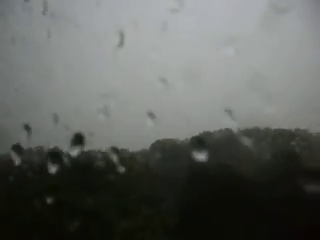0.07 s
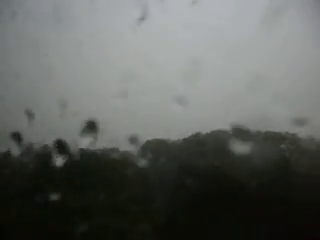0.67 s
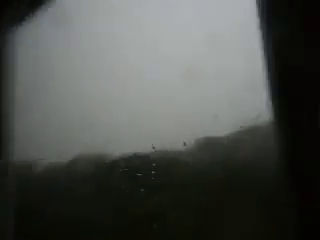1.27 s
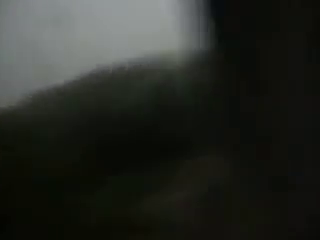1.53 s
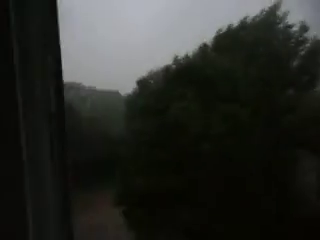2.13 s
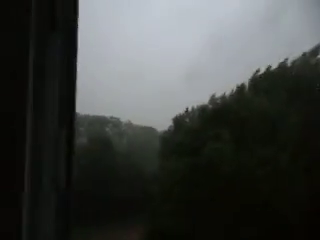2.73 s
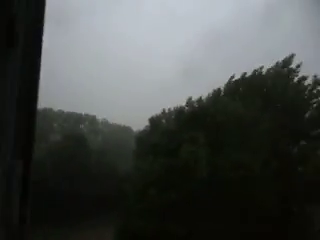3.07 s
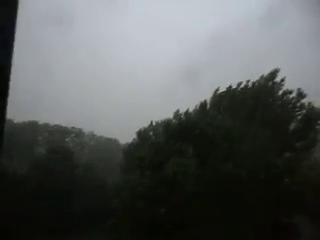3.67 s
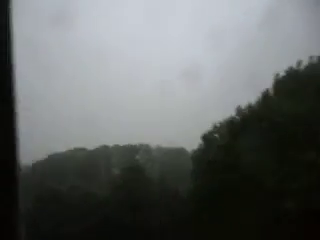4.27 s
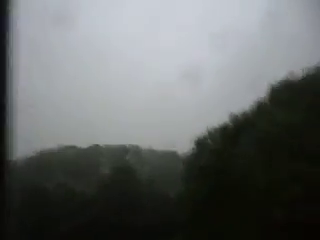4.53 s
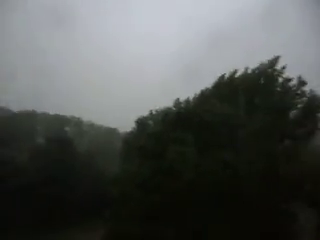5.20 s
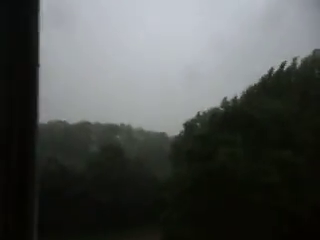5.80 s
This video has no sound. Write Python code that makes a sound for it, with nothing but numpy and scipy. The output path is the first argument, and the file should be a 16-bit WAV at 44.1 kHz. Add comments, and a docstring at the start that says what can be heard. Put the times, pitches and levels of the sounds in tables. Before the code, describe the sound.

A rainstorm is heard on one small microphone at a window. For the first second the wind is a muted rumble, with a low room boom, a faint hum from the glass and fat drops smacking the pane. Dry ticks on the window frame start near 0.7 seconds. At about 1.2 seconds the wind jumps in level with a faint whistle, and a soft hiss of rain on trees rises behind it. From 1.5 to 2.3 seconds the hardest gusts thud and rasp on the microphone, with a hollow roar at the window's edge and a brief whistle near 2.2. The wind then eases somewhat but keeps buffeting, with another run of thumps from 3.2 to 3.9 and more around 4.7 and 5. Single drops click sharply near 2.3, 4.3 and 5.2 seconds. Rain and weaker wind continue until 6 seconds.

```python
"""A rainstorm at a window, on the single microphone of a small camera. It starts close behind the wet pane:
the glass hums, fat drops smack on it, and gusts buffet the microphone and make the room boom like a
blown bottle. Drops begin to tick on the frame. After a second the camera moves to the open casement: the
gap whistles, the hiss of rain on thrashing trees comes up, and drops strike the camera itself. Around two
seconds the hardest gusts set the casement's edge roaring; then the wind eases and the rain carries on."""
import sys
import numpy as np
from scipy import signal
from scipy.fft import rfft, irfft
from scipy.io import wavfile
from scipy.ndimage import uniform_filter1d, map_coordinates

SR = 44100
rng = np.random.default_rng(int(sys.argv[2]) if len(sys.argv) > 2 else 0)


def store_pcm(level_fs):
    """Save levels as 16-bit WAV."""
    pcm = np.round(np.clip(level_fs, -1, 1) * 32767).astype(np.int16)
    wavfile.write(sys.argv[1], SR, np.atleast_2d(pcm).T)


N = 265482


def undb(db):
    """Decibels to gain."""
    return 10 ** (np.asarray(db) / 20)


def unit(x):
    """Scale to rms 1."""
    return x / np.sqrt(np.mean(x ** 2))


def peak(x, db):
    """Scale to a peak level."""
    return x * undb(db) / np.abs(x).max()


def steady(x, span_s):
    """Hold rms 1 over spans of this length; quicker flutter stays."""
    k = int(span_s * SR / 2) + 1
    return x / np.sqrt(uniform_filter1d(uniform_filter1d(x ** 2, k), k) + 1e-18)


def colour(x, points, tilt_db=0):
    """Filter by a (Hz, dB) spectrum, tilted per octave and falling 18 dB an octave past its ends."""
    size = 16384
    octave = np.log2(np.maximum(np.fft.rfftfreq(size, 1 / SR), 1))
    hz, db = np.transpose(points)
    beyond = np.maximum(octave - np.log2(hz[-1]), 0) + np.maximum(np.log2(hz[0]) - octave, 0)
    shape = np.interp(octave, np.log2(hz), db + tilt_db * np.log2(hz / hz.mean())) - 18 * beyond
    # minimum phase: nothing sounds ahead of an attack
    cepstrum = irfft(np.log(undb(shape)))
    cepstrum[1:size // 2] *= 2
    cepstrum[size // 2 + 1:] = 0
    return signal.fftconvolve(x, irfft(np.exp(rfft(cepstrum))))[:len(x)]


def resonate(x, hz, width_hz, passes=1):
    """A resonance with gain 1 at its centre; each further pass narrows it."""
    for _ in range(passes):
        x = signal.lfilter(*signal.iirpeak(hz, hz / width_hz, SR), x)
    return x


def walk(rate_hz):
    """Smooth random motion with a spread of 1."""
    k = max(int(SR / rate_hz), 1)
    return unit(uniform_filter1d(uniform_filter1d(rng.standard_normal(N), k), k))


def wavering_tone(hz, waver, rate_hz):
    """A sine of rms 1 whose pitch wanders by the share `waver`."""
    pitch = hz * (1 + waver * walk(rate_hz))
    return np.sqrt(2) * np.sin(2 * np.pi * np.cumsum(pitch) / SR)


def curve(table):
    """A (time, value) curve at every sample."""
    return np.interp(np.arange(N) / SR, *np.transpose(table))


def bell(s, length_s):
    """A smooth rise and fall around time s, above half its height for length_s."""
    return .5 ** ((2 * (np.arange(N) / SR - s) / length_s) ** 2)


def level_shifts(table):
    """Two dB curves from a table of rises and dips, each a bell in time."""
    return sum(np.outer(dbs, bell(s, length_s)) for s, length_s, *dbs in table)


def add(out, s, sound):
    """Mix a sound in at time s."""
    i = min(max(int(s * SR), 0), N)
    out[i:i + len(sound)] += sound[:N - i]


# wind at the opening: (time [s], strength over a moderate blow [dB])
WIND = [(0, -14.5), (.52, -5.5), (.68, -7), (.92, -3.5), (1.155, -6.5), (1.175, 1), (1.53, -0.5),
        (1.56, 5.5), (1.95, 5.5), (2.2, 5.5), (2.4, 2), (3.0, 0.5), (3.6, 1.5), (4.0, 0), (4.35, -2),
        (5.1, 0), (6.02, -4)]


def blown(db, growth=1, shift_db=0):
    """Gain of a layer: `db` in a moderate blow, `growth` dB more per dB of wind, plus a passing shift."""
    return undb(db + growth * curve(WIND) + shift_db)


# wind on the microphone, four spectra: (frequency [Hz], relative level [dB])
THUD_SPECTRUM = [(50, -24.5), (95, -15), (130, 2.5), (170, -1), (220, -2), (300, -6.5), (400, -8.5),
                 (520, -16), (800, -36.5), (2500, -64.5)]
RASP_SPECTRUM = [(250, -18.5), (450, -1), (600, 0.5), (790, -3), (1000, -6), (1300, -14), (1700, -20.5),
                 (2500, -29), (4500, -54.5), (10000, -74)]
RUMBLE_SPECTRUM = [(35, -7.5), (55, -5), (78, 0.5), (104, -2.5), (125, -11.5), (200, -23)]
FLUTTER_SPECTRUM = [(4, -8), (12, -5.5), (28, 15), (40, 4.5), (70, -27.5)]
# brief flurries and lulls in the wind on the microphone:
# (middle [s], length [s], thud shift [dB], rasp and roar shift [dB])
FLURRIES_AND_LULLS = [(.08, 0.21, -5.5, 0), (1.185, 0.027, 0.5, 3), (1.26, 0.02, 0, 1),
                      (1.435, 0.025, -4, 0.5), (1.565, 0.041, 2.5, 3), (1.722, 0.026, 0, 3),
                      (1.78, 0.023, -2, -2.5), (1.808, 0.026, -1.5, 5), (2.105, 0.037, 0.5, 3.5),
                      (2.165, 0.044, 4, 4), (2.22, 0.045, -0.5, 3), (2.325, 0.029, -7, 2),
                      (2.6, 0.1, -2.5, 0.5), (2.86, 0.1, 5.5, 0), (2.905, 0.03, -7, 1),
                      (3.03, 0.058, 0, -0.5), (3.215, 0.033, 5, -0.5), (3.258, 0.022, -3.5, -1),
                      (3.305, .03, 4, -0.5), (3.34, 0.013, 10, 4), (3.365, 0.018, 1, -3),
                      (3.435, 0.078, 6.5, 2), (3.51, .025, -5, 0), (3.575, 0.016, 3, 0),
                      (3.885, 0.037, 1.5, 2.5), (3.96, 0.027, -1.5, -4), (4.68, 0.045, -4.5, 1),
                      (4.98, 0.037, 2.5, 0.5)]
# slow swells and lulls in the wind's rumble and the room's ringing:
# (middle [s], length [s], rumble and flutter shift [dB], ringing shift [dB])
SWELLS_AND_LULLS = [(.06, .14, -18, -2), (.51, 0.15, 13.5, 6.5), (.89, 0.067, 7, 2), (1.75, 0.13, -2, 5.5),
                    (2.08, 0.12, -7, 1.5), (3.19, 0.17, 9.5, -0.5), (3.48, 0.25, 6.5, 6.5),
                    (3.72, 0.23, 5, 8), (4.11, 0.16, 10, 2), (4.37, .1, 4, 3.5), (4.525, 0.048, 12, 1),
                    (4.67, 0.13, 9, 10), (5.0, 0.25, 1, 5.5), (5.57, 0.36, 7.5, 1.5)]


def wind_on_microphone():
    """Turbulence comes in lumps: big eddies thud, and shed fine ones that rasp at the same moments."""
    thud_db, rasp_db = level_shifts(FLURRIES_AND_LULLS)
    rumble_db, _ = level_shifts(SWELLS_AND_LULLS)
    lumps = walk(69)
    thud = steady(colour(rng.standard_normal(N) * undb(1.17 * lumps), THUD_SPECTRUM), 0.088)
    octaves_per_db = -0.0251  # the rasp sinks a little in pitch as the wind rises
    travel = np.cumsum(2 ** (octaves_per_db * (curve(WIND) - 2)))
    eddies = map_coordinates(colour(rng.standard_normal(N), RASP_SPECTRUM), [travel], mode="mirror")
    rasp = steady(eddies * undb(0.78 * lumps + 0.21 * walk(440)), 0.14)
    rumble = steady(colour(rng.standard_normal(N), RUMBLE_SPECTRUM), 0.23)
    flutter = steady(colour(rng.standard_normal(N), FLUTTER_SPECTRUM), .3)
    return (thud * blown(-27.5, shift_db=thud_db)
            + rasp * blown(-38, shift_db=rasp_db)
            + rumble * blown(-35.5, growth=0.91, shift_db=rumble_db)
            + flutter * blown(-43.5, growth=0.91, shift_db=rumble_db))


# surges of the lowest resonance of the room behind the microphone: (middle [s], length [s], level [dB])
BOOMS = [(0.347, 0.11, -29), (0.623, 0.19, -23.5), (1.378, 0.059, -29), (1.532, 0.067, -27),
         (1.89, 0.17, -29), (2.07, 0.092, -23.5), (3.207, 0.072, -33), (4.753, 0.14, -25),
         (5.182, 0.13, -30.5)]
# the room's higher resonances: (frequency [Hz], width [Hz], relative gain [dB])
ROOM_MODES = [(75.36, 1.3, -1.5), (98, 2.4, -4), (133.3, 8.2, -2.5), (157.3, 1.67, 6.5), (206.7, 14, -14.5),
              (233.9, 8.5, -8), (278, 5.8, -7.5)]


def room_boom():
    """Wind across the opening blows the room's lowest resonance and stirs the higher ones."""
    surge_power = sum((undb(db) * bell(s, length_s)) ** 2 for s, length_s, db in BOOMS)
    boom_gain = np.sqrt(blown(-38.5, growth=0.96) ** 2 + surge_power)
    drone = wavering_tone(hz=43.84, waver=.015, rate_hz=9) * undb(0.37 * walk(7.9))
    # only slow pressure swings act on the room as a whole
    air = signal.sosfilt(signal.butter(4, 400, fs=SR, output="sos"), rng.standard_normal(N))
    ringing = sum(undb(db) * resonate(air, hz, width) for hz, width, db in ROOM_MODES)
    _, ringing_db = level_shifts(SWELLS_AND_LULLS)
    return boom_gain * drone + blown(-35, growth=0.76, shift_db=ringing_db) * steady(ringing, 1.0)


# rain on the trees outside, louder as the microphone clears the pane: (time [s], wash level [dB])
RAIN_LEVEL = [(0, -63.5), (1.15, -63), (1.85, -51), (2.7, -50.5), (5.2, -48.5), (6.02, -49)]
# the wash and its fine spray, heard from the window: (frequency [Hz], relative level [dB])
WASH_SPECTRUM = [(500, 1.5), (1200, 2), (1600, 3), (2100, 6), (2500, 3), (3000, 2.5), (3500, -2.5),
                 (4200, -16), (6000, -17)]
SPRAY_SPECTRUM = [(2500, -10.5), (3900, 2.5), (5000, 3.5), (5600, 2.5), (5950, 0.5), (6600, -5), (8000, -8),
                  (10000, -12), (12000, 0)]


def rain_on_trees(drops_per_s=3000, spray_db=-6):
    """Countless drops on swaying leaves merge into a wash, with a fine spray above it."""
    lands = rng.random(N) < drops_per_s / SR
    sizes = undb(3.2 * np.minimum(rng.exponential(size=N), 6))
    drops = unit(lands * sizes * np.sign(rng.standard_normal(N)))
    leaves = rng.standard_normal(N) * undb(walk(17))
    wash = unit(colour(leaves + 0.96 * drops, WASH_SPECTRUM))
    spray = unit(colour(rng.standard_normal(N) + 0.51 * drops, SPRAY_SPECTRUM))
    return undb(curve(RAIN_LEVEL)) * (wash + undb(spray_db) * spray)


def pane_hum(level_db=-42.5, leave_s=0.99):
    """The wind makes the glass hum, heard only while the microphone is close behind it."""
    hum = resonate(rng.standard_normal(N), hz=233, width_hz=59, passes=2)
    return undb(level_db) * steady(hum, 0.16) * bell(leave_s / 2, leave_s + .3)


# drops on the window, from inside: (time [s], peak [dB], tilt [dB/octave], ring of the spot hit [Hz])
SMACKS = [(0.003, -37.5, -7.5, 2830), (0.015, -41, -2, 1900), (0.028, -37, -5, 2900),
          (0.039, -44, -5, 1800), (0.056, -42, -5, 2900), (0.119, -42, -2.5, 1820),
          (0.122, -35.5, -5.5, 2750), (0.382, -37.5, 5, 2850), (0.4354, -40, 3, 2950),
          (0.673, -43, -7.5, 2900), (0.79, -38, 3.5, 3000), (0.851, -42.5, 13, 3000),
          (0.856, -30, -0.5, 2970), (0.883, -43, 9, 2900), (1.13, -41.5, 0, 2700), (1.1524, -35.5, 4, 2250),
          (1.262, -39.5, 0, 2800), (1.276, -42, -2, 2750), (1.339, -35, -1, 2900), (1.378, -38.5, 4, 3100),
          (1.397, -38.5, 4, 3050), (5.2414, -32, -3, 2850)]
# a smack on a spot that rings at 2900 Hz: (frequency [Hz], relative level [dB])
SMACK_SPECTRUM = [(700, -4), (1500, -1.5), (2200, 2), (2900, 7), (3500, 1.5), (4200, -8.5), (5800, -13.5),
                  (7000, -21), (10000, -31)]


def window_smacks():
    """Each fat drop bursts on the window: a hard crack, a brief splash, and the room carrying it on."""
    out, t = np.zeros(N), np.arange(SR // 3) / SR
    crack_t60, splash_t60, room_t60 = 0.011, 0.13, 0.35
    crack_db, tail_db = 2, -5.5
    burst_decay = undb(crack_db - 60 * t / crack_t60) + undb(-60 * t / splash_t60)
    walls = signal.butter(2, 4500, fs=SR, output="sos")  # they soak up the tail's treble
    for s, db, tilt_db, hz in SMACKS:
        splash, echo = rng.standard_normal((2, len(t)))
        tail = signal.sosfilt(walls, echo) * undb(tail_db - 60 * t / room_t60)
        spot = np.multiply(SMACK_SPECTRUM, [hz / 2900, 1])
        add(out, s, peak(colour(splash * burst_decay + tail, spot, tilt_db), db))
    return out


# short trains of eddies right on the microphone: (time [s], peak [dB], centre [Hz], fall time [s])
SLAPS = [(.521, -20, 130, .006), (1.198, -19, 170, .014), (1.271, -18, 150, .012),
         (1.556, -14.5, 480, .0025), (1.562, -16, 450, .002), (1.586, -10.5, 160, .007),
         (1.718, -8.7, 175, .008), (1.740, -14, 170, .007), (1.802, -9, 160, .006), (1.849, -14, 180, .004),
         (2.018, -15, 150, .005), (2.088, -12, 300, .003), (2.101, -15, 420, .0025),
         (2.160, -10.5, 195, .007), (2.172, -16, 620, .0018), (2.296, -13.5, 160, .005),
         (2.831, -18, 210, .005), (3.161, -14.5, 320, .003), (3.205, -11.5, 125, .007),
         (3.3365, -15.5, 760, .0011), (3.348, -11.5, 200, .004), (3.392, -14, 250, .003),
         (3.409, -14, 200, .005), (3.427, -11.5, 230, .006), (3.472, -10.5, 165, .008),
         (3.5432, -6, 560, .00055), (3.5475, -14, 230, .003), (3.643, -15, 300, .002),
         (3.809, -12, 190, .005), (3.891, -14, 330, .0035), (4.621, -18, 150, .01),
         (4.692, -14.5, 150, .016), (4.977, -15.5, 170, .007), (4.993, -17, 190, .004),
         (5.119, -17, 170, .004), (5.458, -17, 190, .004)]


def vortex_slaps(unevenness=.3):
    """A few unevenly spaced vortices cross the microphone: suction and pressure briefly alternate."""
    out, half = np.zeros(N), SR // 15
    t = np.arange(-half, half) / SR
    for s, db, hz, fall_s in SLAPS:
        spacing = np.tanh(unit(uniform_filter1d(rng.standard_normal(len(t)), int(SR / hz / 2))))
        turns = np.cumsum(hz * (1 + unevenness * spacing)) / SR
        pressure = -np.cos(2 * np.pi * (turns - turns[half]))
        envelope = undb(db) / (1 + (t / fall_s) ** 2) ** 2
        add(out, s - half / SR, pressure * envelope)
    return out


# drops on the window frame, beside the microphone: (time [s], peak [dB], ring [Hz])
TICKS = [(.7455, -42, 2400), (.8555, -29, 2400), (.8568, -32, 3900), (0.9306, -33.5, 1400),
         (.9648, -36.5, 2200), (.9947, -31, 1450), (1.533, -32, 1590), (1.602, -33, 2400),
         (1.727, -34.5, 2880), (1.7795, -22, 1300), (1.7835, -24.5, 1350), (1.926, -30, 1500),
         (2.172, -26.5, 1550), (2.338, -34.5, 3080), (3.0223, -34, 2280), (4.170, -34, 2950)]
# one tick: (frequency [multiple of its ring], relative level [dB])
TICK_SPECTRUM = [(.5, -8), (.75, -5.5), (1, 4.5), (1.25, -2), (1.6, -13.5), (2.2, -14.5), (2.8, -28),
                 (5, -36)]


def frame_ticks(spatter=0.081, spatter_t60=0.01):
    """Small drops tick dryly on the frame: a sharp impact and a trace of spatter."""
    out, t = np.zeros(N), np.arange(SR // 20) / SR
    impact = signal.unit_impulse(len(t))
    for s, db, hz in TICKS:
        burst = impact + spatter * rng.standard_normal(len(t)) * undb(-60 * t / spatter_t60)
        add(out, s, peak(colour(burst, np.multiply(TICK_SPECTRUM, [hz, 1])), db))
    return out


# whistles in the gap of the casement: (middle [s], length [s], pitch [Hz], level [dB])
WHISTLES = [(1.23, .09, 950, -50), (1.23, 0.093, 1140, -47), (1.235, 0.084, 1295, -52),
            (2.23, .06, 810, -35.5)]


def gap_whistles():
    """Thin wavering notes as a gust finds the gap of the casement."""
    return sum(undb(db) * bell(s, length_s) * wavering_tone(hz, waver=.008, rate_hz=60)
               for s, length_s, hz, db in WHISTLES)


# drops on the camera, at the microphone: (time [s], peak [dB], tilt [dB/octave], lowest mode lift [dB])
SHELL_HITS = [(1.434, -40.5, 0, 4), (1.5935, -41, -1, 2), (1.719, -44, -2, 0), (2.276, -25, -1, 0),
              (2.544, -36, -4, 6), (3.1883, -31, -10, 2), (3.783, -42, 14, 0), (4.2647, -27.5, -7, 1),
              (4.2708, -32.5, -9, 2), (5.757, -37, 2, 3)]
# modes of the camera's shell: (frequency [Hz], width per pass [Hz], relative level [dB])
SHELL_MODES = [(2930, 600, -9), (4100, 900, -6), (4900, 800, -4.5), (5900, 650, -1), (7250, 900, -9),
               (9000, 900, -16), (10100, 900, -18)]


def camera_drops(spatter=0.2, flatten_s=0.0017, spot_scatter=0.024):
    """Drops on the camera ring its shell for a few milliseconds; each spot shifts the modes a little."""
    out, t = np.zeros(N), np.arange(SR // 20) / SR
    impact = signal.unit_impulse(len(t))
    for s, db, tilt_db, lift_db in SHELL_HITS:
        # the drop keeps pushing while it flattens
        push = impact + spatter * rng.standard_normal(len(t)) * np.exp(-(t / flatten_s) ** 2)
        modes = np.multiply(SHELL_MODES, [1 + spot_scatter * rng.standard_normal(), 1, 1])
        lowest, *higher = (
            undb(mode_db + tilt_db * np.log2(hz)) * unit(resonate(push, hz, width, passes=2))
            for hz, width, mode_db in modes)
        add(out, s, peak(undb(lift_db) * lowest + sum(higher), db))
    return out


def casement_roar():
    """Only the hardest gusts set the casement's edge roaring; its hollow note wanders with the air."""
    _, roar_db = level_shifts(FLURRIES_AND_LULLS)
    roar = resonate(rng.standard_normal(N), hz=740, width_hz=245, passes=2)
    wandering = map_coordinates(roar, [np.cumsum(1 + .05 * walk(8))], mode="mirror")
    return steady(wandering, 0.14) * blown(-51, growth=2.36, shift_db=roar_db)


def scene():
    """Everything as it reaches the single microphone at the window."""
    gusts = wind_on_microphone() + room_boom()
    water = rain_on_trees() + window_smacks() + frame_ticks() + camera_drops()
    close_air = vortex_slaps() + casement_roar() + gap_whistles() + pane_hum()
    return (gusts + water + close_air)[None]


def record(dry):
    """The camera adds faint hiss and a thin electronic whine, and cuts the top."""
    whine_hz, whine_db, hiss_db, top_hz = 7140, -82, -64, 10420
    whine = np.sqrt(2) * undb(whine_db) * np.sin(2 * np.pi * whine_hz * np.arange(N) / SR)
    hiss = undb(hiss_db) * rng.standard_normal(N)
    return signal.sosfilt(signal.butter(24, top_hz, fs=SR, output="sos"), dry + whine + hiss)


dry = scene()
out = record(dry)
store_pcm(out)
```